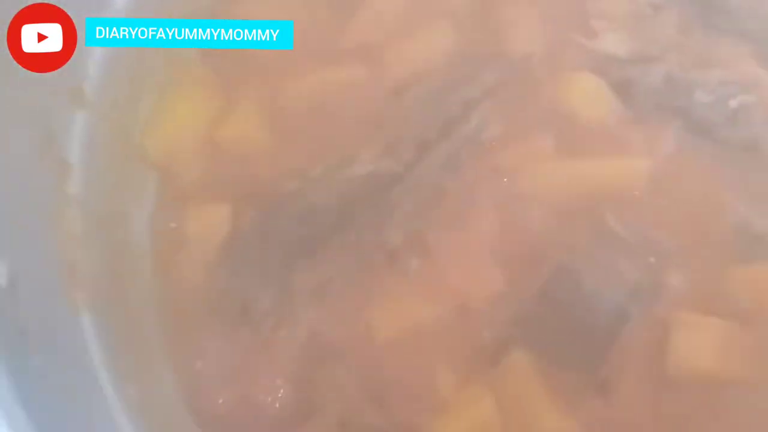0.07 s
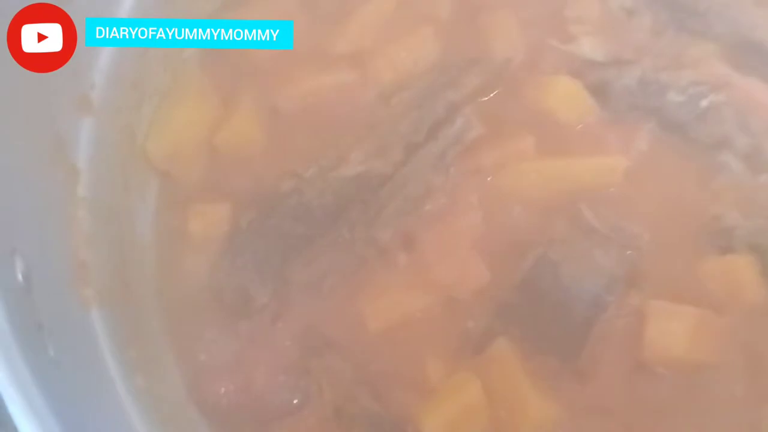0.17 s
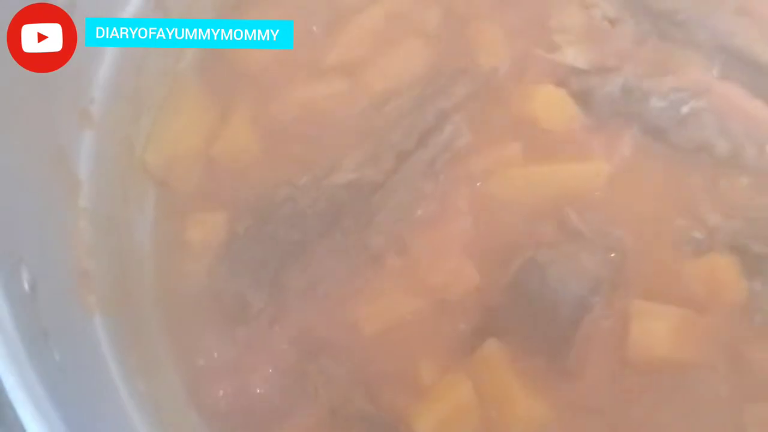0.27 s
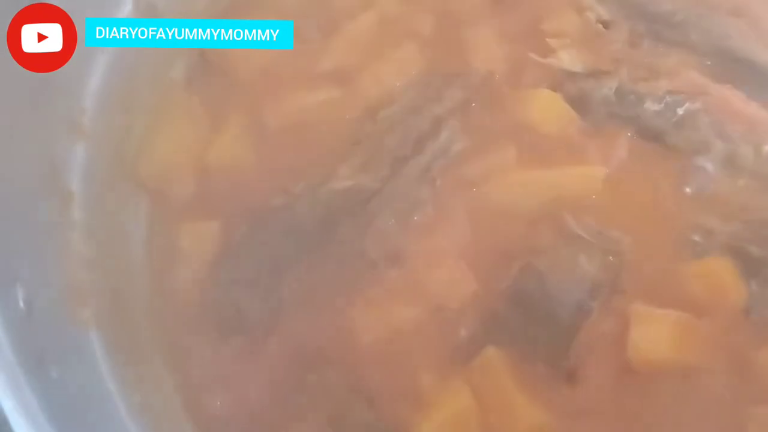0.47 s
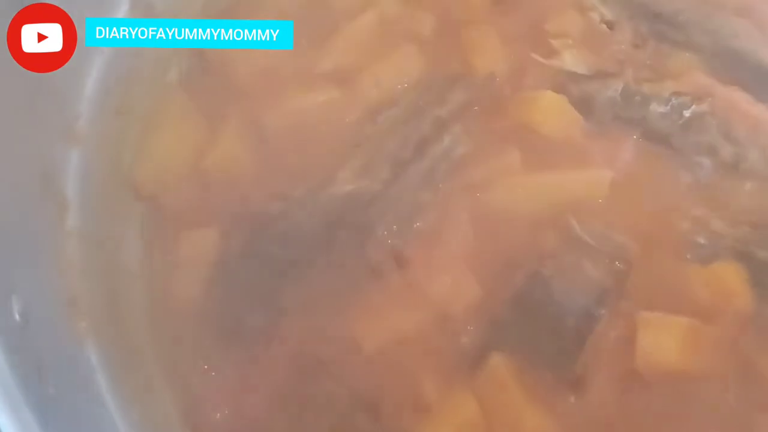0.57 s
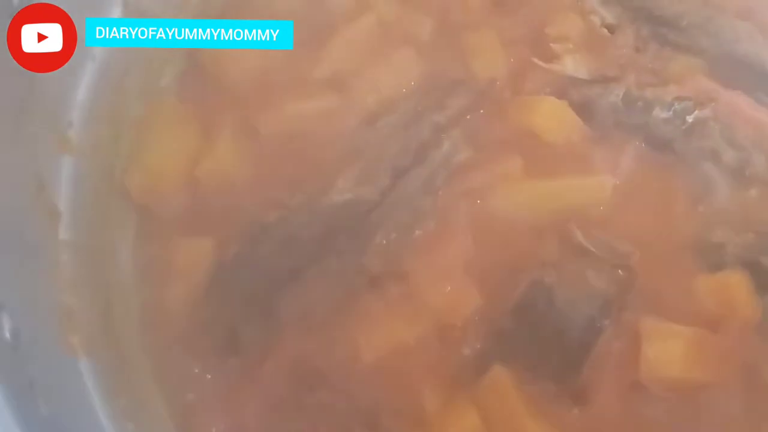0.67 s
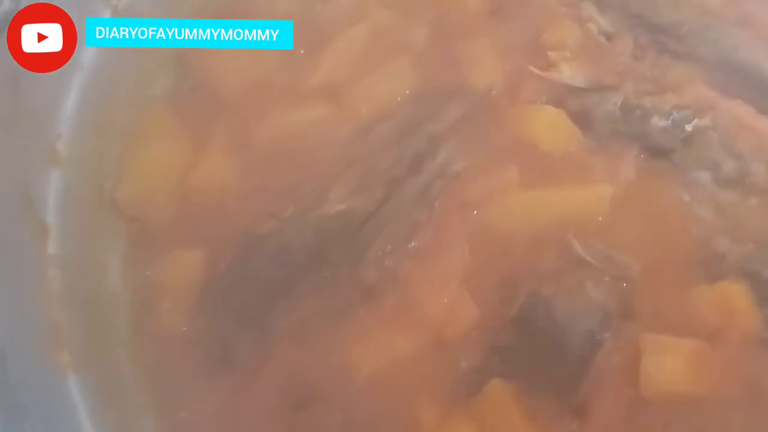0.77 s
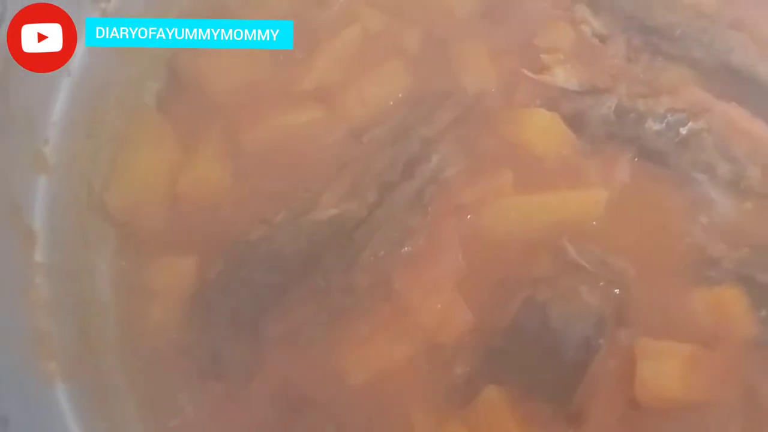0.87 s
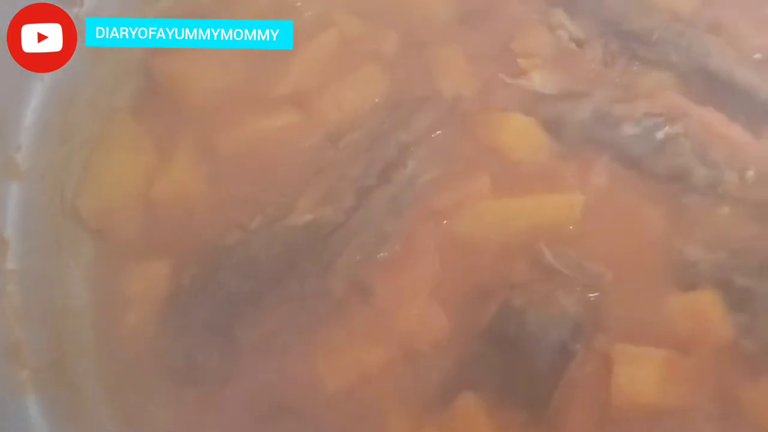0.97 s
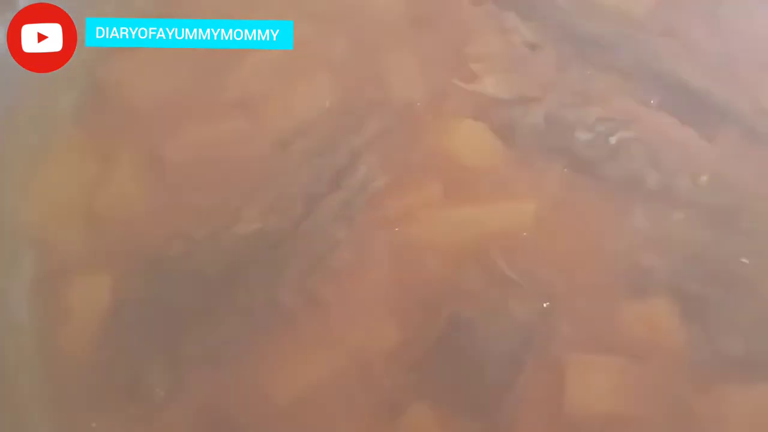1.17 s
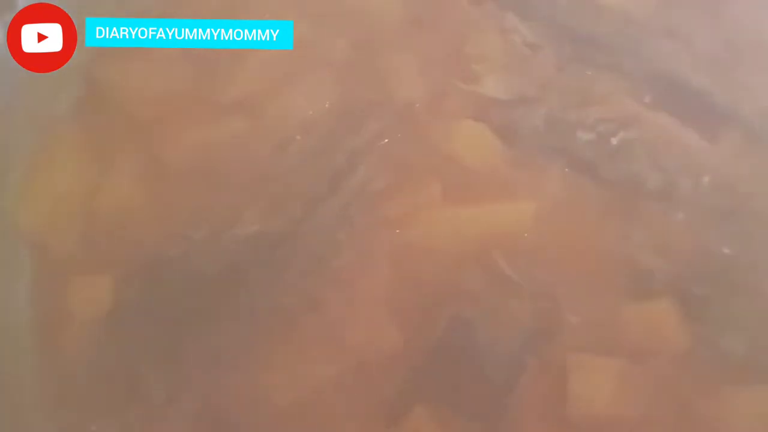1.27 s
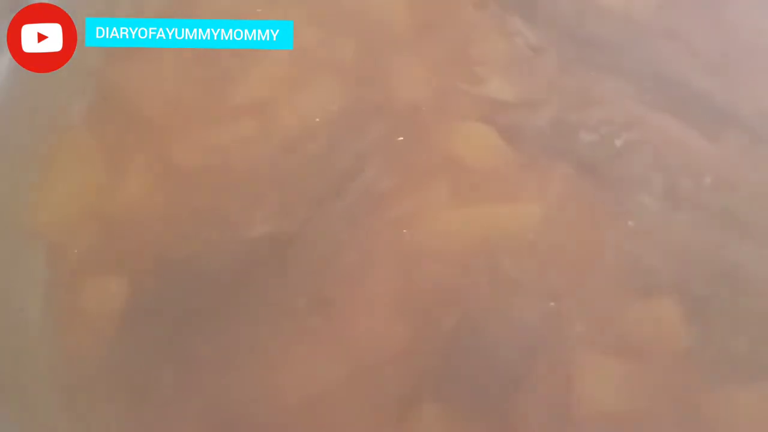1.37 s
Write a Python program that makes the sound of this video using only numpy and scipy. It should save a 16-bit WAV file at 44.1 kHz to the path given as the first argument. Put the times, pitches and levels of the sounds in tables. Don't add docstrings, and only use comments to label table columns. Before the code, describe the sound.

Thick food simmers close by in a steel pot, low hollow plops and bright wet pops over soft steam hiss; midway a dish with a spoon rattles, slides and lands hard on the counter, ringing through the kitchen.

```python
import sys
import numpy as np
from scipy import signal
from scipy.fft import rfft, irfft
from scipy.io import wavfile
from scipy.ndimage import uniform_filter1d

SR = 44100
rng = np.random.default_rng(int(sys.argv[2]) if len(sys.argv) > 2 else 0)


def to_wav(sig):
    pcm = np.clip(np.atleast_2d(sig), -1, 1) * 32767
    pcm = np.round(pcm).astype(np.int16)
    wavfile.write(sys.argv[1], SR, pcm.T)


def elevation(decibels):
    levels = np.asarray(decibels, float)
    return 10 ** (levels / 20)


N = 61739
LANDING_S = 0.7907
RIGHT_LATE_S = 0.00039


def read(points, hz):
    f, value = np.transpose(points)
    return np.interp(np.log(hz + 1), np.log(f + 1), value)


def evened(x):
    return x / np.sqrt(np.mean(x ** 2) + 1e-20)


def add(mix, s, sound):
    part = mix[..., round(s * SR):][..., :sound.shape[-1]]
    part += sound[..., :part.shape[-1]]


def rings(modes):
    t = np.arange(SR // 2) / SR
    x = np.zeros(len(t))
    for k, (hz, db, t60) in enumerate(modes):
        x += (-1) ** k * elevation(db - 60 * t / t60) * np.sin(2 * np.pi * hz * t)
    return x / np.linalg.norm(x)


def causal(spectrum):
    hz = np.fft.rfftfreq(1024, 1 / SR)
    log_gain = np.log(elevation(read(spectrum, np.r_[hz, hz[-2:0:-1]])))
    click = np.fft.ifft(np.exp(signal.hilbert(log_gain).conj())).real[:512]
    return click / np.linalg.norm(click)


def alike(z, same):
    same = np.clip(same, -1, 1)[:, None]
    return np.array([z[0], same * z[0] + np.sqrt(1 - same ** 2) * z[1]])


def bubble(hz, cycles, glide):
    u = np.arange(round(3 * cycles / hz * SR)) / SR * hz / cycles
    swell = np.e * 4 * u * np.exp(-4 * u)
    return swell * np.sin(2 * np.pi * cycles * (u + glide * u ** 2))


def drips(per_s, spread_db):
    size, sign, chance = rng.random((3, N))
    level = elevation(spread_db * np.minimum(-np.log(size), 4))
    return level * np.sign(sign - 0.5) * (chance < per_s / SR)


# start in seconds, level in dB, pitch in
# Hz.
LARGE_PLOPS = [(0.036, -18, 502), (0.051, -20, 460), (0.095, -23, 522), (0.112, -21, 556),
               (0.171, -28, 537), (0.2, -13, 510), (0.228, -27, 649), (0.267, -28, 490),
               (0.289, -17.5, 490), (0.313, -21, 520), (0.323, -32, 650), (0.354, -15.5, 478),
               (0.366, -21, 576), (0.383, -20, 420), (0.424, -21, 496), (0.441, -18, 644),
               (0.454, -23, 524), (0.48, -19.5, 506), (0.506, -18, 563),
               (0.45, -20.5, 420),
    (.59, -16, 297),
    (.692, -9, 536),
    (0.61, -26, 152),
    (.745, -13, 820),
    (0.7, -23.5, 279),
    (.905, -21, 112),
               (0.953, -24, 410), (0.999, -23, 490), (1.007, -15, 501), (1.076, -18, 563),
               (1.096, -34, 540), (1.148, -15, 516), (1.216, -20, 450), (1.272, -18.5, 480),
               (1.292, -24, 570), (1.333, -19, 573), (1.357, -14, 503)]


def plops():
    out = np.zeros(N)
    for s, db, hz in LARGE_PLOPS:
        add(out, s, elevation(db - 5) * bubble(hz, cycles=4.64, glide=0.035))
    return out


# start in seconds, level in dB.
BASE_SHAKES = [
    (0.289, -31),
    (0.349, -32.5),
    (.792, -17.5),
    (0.999, -33.5),
]


def pot_base():
    base_hz, t60, rise_s = 269, 0.51, 0.0031
    t, out = np.arange(SR // 2) / SR, np.zeros(N)
    for s, db in BASE_SHAKES:
        add(out, s, elevation(db - 60 * t / t60) * np.minimum(t / rise_s, 1) * np.sin(2 * np.pi * base_hz * t))
    return out


def spray():
    return rng.standard_normal((2, 400)) * np.exp(-np.arange(400) / 43)


# start in seconds, level in dB, pitch in Hz, left minus right in dB.
SMALL_POPS = [(0.0655, -21, 6170, -4), (0.0863, -27, 1850, 3), (0.1451, -23.5, 3120, -3),
              (0.174, -22.5, 1860, 7), (0.188, -21.5, 3380, -8), (0.1999, -16, 5730, -27),
              (0.2044, -14.5, 5500, -8), (0.2683, -25.5, 1370, 5), (0.2925, -18, 3330, 9),
              (0.3034, -31, 2130, 8), (0.355, -39, 1980, 4), (0.3775, -27, 2860, 7),
              (0.4447, -16.5, 3270, 18), (0.484, -30, 1750, 6), (0.6679, -12, 2700, 4),
              (0.6974, -23, 2470, 6), (0.723, -16.5, 3280, -6), (1.0099, -21, 4230, -10),
              (1.0008, -21.5, 2620, 0), (1.078, -22, 1520, 3), (1.1009, -19, 4950, -27),
              (1.1045, -20.5, 5700, -16), (1.131, -46, 3680, 24), (1.1499, -19, 2300, 30),
              (1.1896, -16.5, 5360, -21), (1.2014, -21, 4400, -6), (1.2025, -26.5, 6500, 0),
              (1.009, -21.5, 7900, -5), (1.136, -25, 4730, -12), (.118, -23, 2560, 6),
              (.455, -25, 2930, 21), (.638, -20, 3960, 6), (.385, -24, 2220, 4), (1.3615, -23, 3570, -22),
              (1.2274, -20, 2680, 8), (1.3348, -13.5, 2930, 19), (1.3572, -12, 2930, -5)]


def pops():
    cycles, glide, burst_s, scatter = 3.34, 0, 0.004, 0.14
    out = np.zeros((2, N))
    for s, db, hz, pan_db in SMALL_POPS:
        pan = elevation(db - 4 + np.clip([[pan_db], [-pan_db]], -6, 6) / 2)
        add(out, s, pan * bubble(hz, cycles, glide))
        add(out, s, pan * 0.19 * signal.lfilter([1, -1], [1, -1.2, 0.45], spray()) / 2)
        for late, size in rng.random((4, 2)):
            droplet_hz = hz * np.exp(scatter * (1 - 2 * size))
            add(out, s + late * burst_s, pan * 0.5 * bubble(droplet_hz, cycles, glide))
    return out


# start in seconds, level in dB.
SKIN_SNAPS = [(0.0647, -29.5), (0.116, -37), (0.1448, -29), (0.199, -42), (0.2025, -31), (0.292, -39),
              (0.355, -33), (.375, -38), (.484, -25.5), (.592, -35), (.669, -25), (.902, -25), (1.001, -35),
              (1.01, -40), (1.098, -40), (1.1033, -33), (1.148, -47), (1.174, -20), (1.1893, -44),
              (1.2277, -34), (1.3345, -50)]


def snaps():
    out = np.zeros((2, N))
    for s, db in SKIN_SNAPS:
        snap = spray()
        add(out, s, elevation(db) * signal.lfilter([1, -1], [1, -0.5], snap + 0.22 * snap[::-1]))
    return out


# frequency in Hz, width in Hz, level in dB.
POT_HOLLOW = [(257, 41, -5), (486, 160, -3.5), (494, 83, 5), (629, 75, 2)]


def murmur():
    t, out = np.arange(3000) / SR, np.zeros(N)
    for hz, width, db in POT_HOLLOW:
        ring = elevation(db) * t * np.exp(-2 * np.pi * width * t) * width * np.sin(2 * np.pi * hz * t)
        out += signal.oaconvolve(drips(per_s=210 / 4, spread_db=1), ring)[:N]
    return elevation(-37.5) * evened(out)


def fizz():
    out = np.zeros((2, N))
    for hz in np.geomspace(900, 11000, 16):
        x = signal.oaconvolve(drips(per_s=500 / 16, spread_db=4), bubble(hz, cycles=2.06, glide=0.14))[:N]
        side = rng.uniform(-1.5, 1)
        left = np.roll(x, round(8 * side)) * elevation(3.8 * side)
        out += [left, x * elevation(-3 * side)]
    return elevation(-42) * evened(out)


# frequency in Hz, level in dB.
SLAM_COLOUR = [(200, -14), (600, 6), (1100, 2), (1700, 2.5), (3200, 0.5), (5500, -3.5), (9000, -10),
               (16000, -21)]


def slams():
    out = np.zeros(N)
    add(out, LANDING_S, elevation(20) * causal(SLAM_COLOUR))
    add(out, 0.5292, elevation(20 - 15) * causal(SLAM_COLOUR))
    return out


# time in seconds, level in dB.
SLIDE_LEVEL = [
    (.53, -75),
    (.56, -34.5),
    (0.696, -35),
    (.72, -63),
    (.745, -28),
    (0.789, -27),
    (.8, -93),
]


def slide(grain):
    s, db = np.transpose(SLIDE_LEVEL)
    return elevation(np.interp(np.arange(N) / SR, s, db, -99, -99)) * grain


# start in seconds, level in dB, length in seconds.
SPOON_GRATES = [
    (0.616, -21.5, 0.0064),
    (0.625, -29.5, .026),
    (0.667, -24, 0.004),
    (0.7219, -39.5, .03),
]


def spoon(grain):
    t, out = np.arange(3000) / SR, np.zeros(N)
    for s, db, length in SPOON_GRATES:
        add(out, s, elevation(db) * (t < length) * grain[round(s * SR):][:len(t)])
    return out


# start in seconds, level in dB, counter in dB, rim in dB, cabinet in dB.
CONTACTS = [(0.5292, -8, -10.5, 3, 0), (.5345, -20, -5, -25, 12), (.542, -33, -38, -15, 11),
            (0.6123, -19, -9, 6, -1.5), (0.619, -21, -13, 9, -23), (.637, -28, 2, 12.5, -24),
            (.662, -24, -0.5, 5, -21), (.742, -27, -27, 6, -3), (.7493, -25, -22, 10, -0.5),
            (0.768, -28, -22, -11, 1), (0.7904, -3, 0, -1, -1.5), (.795, -5, -16, -6, -3)]
# frequency in Hz, level in dB, time to fall 60 dB in seconds.
COUNTER_MODES = [(295, -5, 0.47), (439, 5, 0.15), (352, -23, 0.053), (394, 11, 0.064)]
RIM_MODES = [(533, -3.5, 0.039), (620, -8, 0.039), (753, -6, 0.028), (848, -2.5, 0.035), (1004, 0.5, 0.023),
             (1400, -4, 0.082)]
DISH_MODES = [(2540, 0.5, 0.034), (2040, -8.5, 0.091), (2557, -10, 0.057), (4234, 2, 0.03),
              (2374, -7.5, 0.13), (4840, -3, 0.019), (2760, -11.5, 0.038), (5180, -13, 0.032),
              (3330, -4, .05)]
SPOON_MODES = [(1900, -3, 0.03), (3362, 0, 0.06), (3950, -4, 0.02), (2480, -3, .025)]
CABINET_MODES = [(57.2, -0.5, 0.6), (109.2, 1.5, 0.65)]
LANDED_MODES = [(2542, -3, 0.3), (2588, -1, 0.2), (2020, -1.5, 0.26), (2099, -3.5, 0.13),
                (2710, -6.5, 0.34), (2800, -3, 0.41), (3190, -15.5, 0.21), (4180, -3, .05), (808, -5, 0.23),
                (955, -4.5, 0.35), (538, -1.5, 0.27)]
# frequency in Hz, level in dB per Hz.
CRACK_COLOUR = [(120, 4), (250, -9), (450, -12.5), (1200, 6.5), (3000, -7.5), (6000, -12), (16000, -23.5)]


def dish():
    decay_s, rise_s, strike_db, chatter = 0.0053, 0.00047, 19, 0.81
    wood, rim, body, air, push = np.zeros((5, N))
    t = np.arange(3000) / SR
    for s, db, counter_db, rim_db, cabinet_db in CONTACTS:
        rough = rng.standard_normal(len(t))
        force = elevation(db) * np.exp(-t / decay_s * 2) * np.minimum(t / rise_s, 1) * rough
        strike = -elevation(db + strike_db) * np.exp(-t * 8000) / 5
        blow = chatter * force + strike
        add(wood, s, elevation(counter_db) * strike)
        add(rim, s, elevation(rim_db) * blow)
        add(body, s, blow)
        add(air, s, force)
        add(push, s, elevation(db + cabinet_db) * (t == 0))
    grain = evened(drips(per_s=3000, spread_db=2.4))
    rub = slide(grain)

    def through(drive, response):
        return signal.fftconvolve(drive, response)[:N]

    knock = through(wood + 0.99 * rub, rings(COUNTER_MODES))
    add(knock, LANDING_S, elevation(13) * rings(LANDED_MODES))
    ring = through(rim + 2.57 * rub, rings(RIM_MODES))
    ring += elevation(0.5) * through(body + 0.35 * rub, rings(DISH_MODES))
    ring += elevation(-0.5) * through(air + 0.62 * rub, causal(CRACK_COLOUR))
    ring += through(spoon(grain), rings(SPOON_MODES))
    slow_rise = 1 - np.exp(-np.arange(SR // 2) / SR / 0.01)
    boom = elevation(24.5) * through(push, rings(CABINET_MODES) * slow_rise)
    return ring, knock, boom


# frequency in Hz, left minus right in dB.
SIDE_BALANCE = [(60, 7.5), (240, -1), (950, -1), (3770, -18), (15000, 11.5)]


def from_the_side(ring):
    hz = np.fft.rfftfreq(2 * N, 1 / SR)
    gain = elevation(read(SIDE_BALANCE, hz) * [[0.5], [-0.5]])
    delay = np.exp(-2j * np.pi * hz * [[0], [RIGHT_LATE_S]])
    return irfft(rfft(ring, 2 * N) * gain * delay)[:, :N]


# frequency in Hz, time to fall 60 dB in seconds.
KITCHEN_T60 = [(60, 1), (300, 0.3), (1000, 0.51), (3000, 0.5), (8000, 0.5), (15000, 0.2)]
# frequency in Hz, left-right likeness from -1 to 1.
KITCHEN_SAME = [(100, 0.94), (500, 0.78), (1500, 0.44), (5000, 0.059)]
# frequency in Hz, level in dB.
KITCHEN_COLOUR = [(200, -2.5), (600, -5.5), (1300, 0.5), (2250, -1), (2700, -1.5), (4500, -3), (8000, -5.5),
                  (15000, -4)]


def kitchen(x):
    taps = np.zeros((2, SR))
    at = np.arange(200, SR - 20, 20) + rng.integers(0, 20, (2, (SR - 201) // 20))
    np.put_along_axis(taps, at, rng.choice([-1., 1.], at.shape), 1)
    hz, t, z = signal.stft(taps, SR, nperseg=256)
    z = alike(z, read(KITCHEN_SAME, hz)) * elevation(-60 * t / read(KITCHEN_T60, hz)[:, None])
    late_s = RIGHT_LATE_S * np.clip(hz / 1200, 0, 1)
    z[1] *= np.exp(-2j * np.pi * hz * late_s)[:, None]
    tail = signal.istft(z, SR, nperseg=256)[1]
    fine = rfft(tail)
    colour = elevation(read(KITCHEN_COLOUR, np.fft.rfftfreq(tail.shape[1], 1 / SR)))
    fine *= colour / np.sqrt(uniform_filter1d(abs(fine) ** 2, size=90))
    tail = irfft(fine)
    return signal.fftconvolve(x[None], tail / np.linalg.norm(tail[0]), axes=1)[:, :N]


# frequency in Hz, level in dB per Hz.
STEAM_COLOUR = [(18, -48), (30, 10), (75, -4.5), (204, -9.5), (511, -3), (1010, -14), (3480, -18.5),
                (11900, -28), (16000, -36)]
# frequency in Hz, left-right likeness from -1 to 1.
STEAM_SAME = [(60, 0.91), (180, 0.97), (550, 1), (1650, -0.14), (4970, 0.066), (15000, -0.3)]


def hiss():
    patch_db, flicker_db = 1, 2.5
    frames, hz = N // 128 + 5, np.fft.rfftfreq(512, 1 / SR)
    a, b, c, d, patches = rng.standard_normal((5, 257, frames))
    flicker = evened(uniform_filter1d(patches[0], 4))
    patches = evened(uniform_filter1d(uniform_filter1d(patches, 8, 0), 8, 1))
    sway_db = (patch_db * patches + flicker_db * flicker) * np.minimum(hz / 400, 1)[:, None]
    z = alike(np.array([a + 1j * b, c + 1j * d]) * elevation(sway_db), read(STEAM_SAME, hz))
    x = signal.istft(z, nperseg=512, noverlap=384)[1][:, :N]
    fine = rfft(x) * elevation(read(STEAM_COLOUR, np.fft.rfftfreq(N, 1 / SR)))
    return elevation(-30) * evened(irfft(fine, N))


def scene():
    pot = plops() + pot_base() + pops() + snaps() + murmur() + fizz()
    ring, knock, boom = dish()
    far = elevation(-1) * (elevation(-6) * ring + knock) + slams() + elevation(-9) * pot.mean(0)
    return pot + boom + knock + from_the_side(ring) + kitchen(far) + hiss()


def band_limit(x):
    return signal.sosfilt(signal.butter(12, 16100, fs=SR, output="sos"), x)


def record(dry):
    low_cut_hz, limit_db, duck, recover_db_per_s, settle = 64, -13, 0.63, 0.5, 18000
    power_db = 10 * np.log10(abs(uniform_filter1d((dry ** 2).mean(0), 800)) + 1e-12)
    cut = signal.sosfilt(signal.butter(3, low_cut_hz, 'high', fs=SR, output='sos'), dry)
    fall = np.arange(N) * recover_db_per_s / SR
    held_db = np.maximum.accumulate(power_db + fall) - fall
    over_db = np.maximum(held_db - limit_db, 0)
    slow_db = signal.lfilter([1 / settle], [1, 1 / settle - 1], over_db)
    return band_limit(np.clip(cut / elevation(duck * slow_db), -1, 1))


dry = scene()
out = record(dry)
to_wav(out)
```